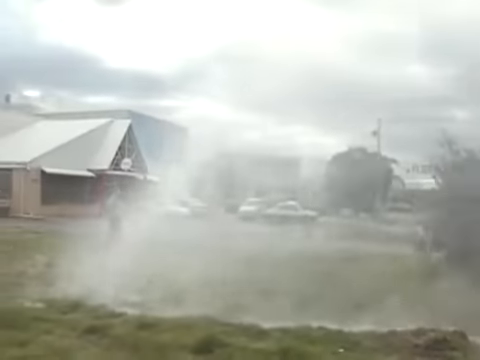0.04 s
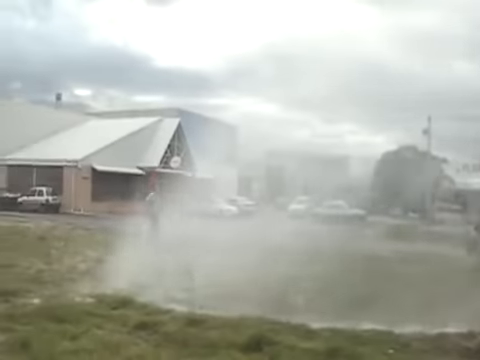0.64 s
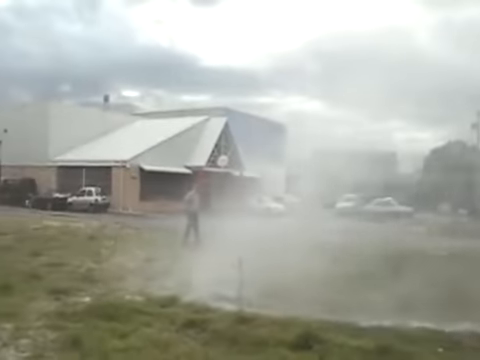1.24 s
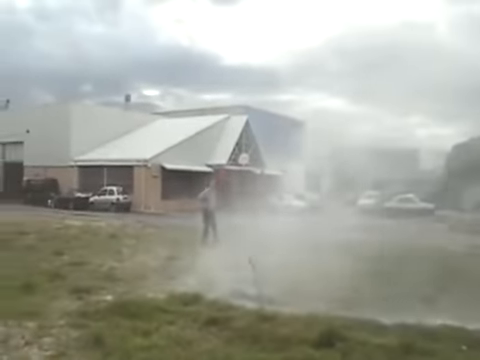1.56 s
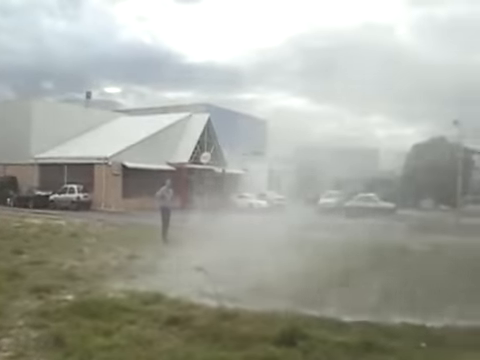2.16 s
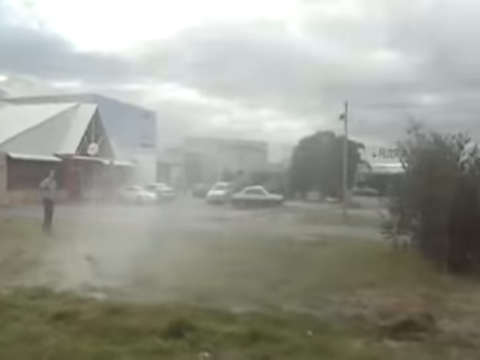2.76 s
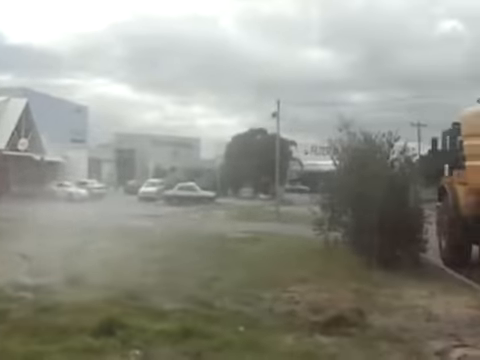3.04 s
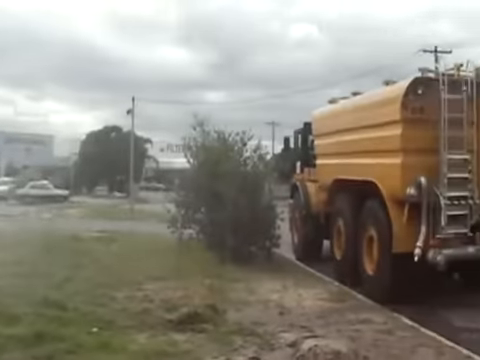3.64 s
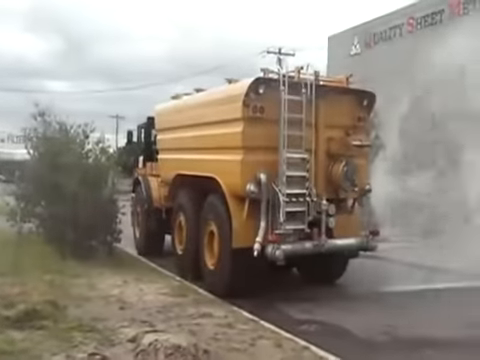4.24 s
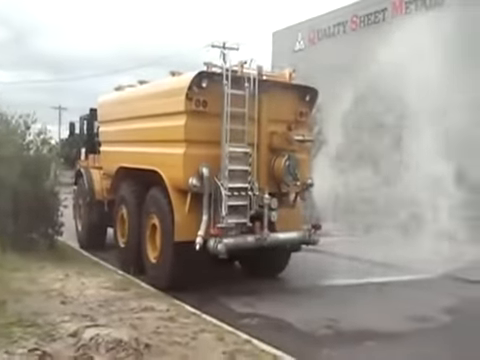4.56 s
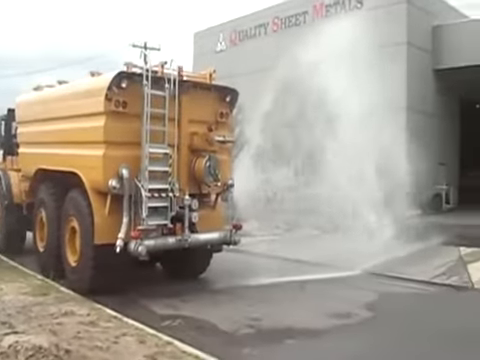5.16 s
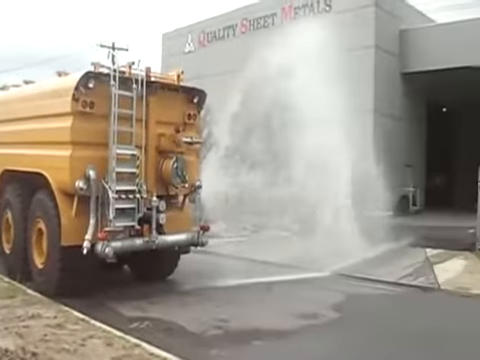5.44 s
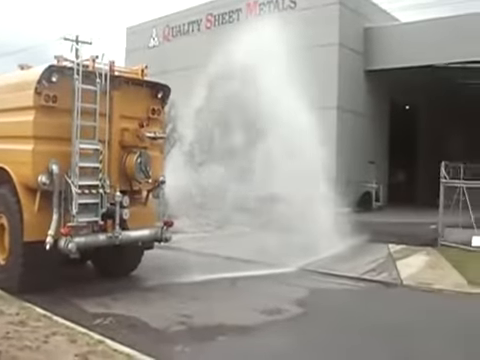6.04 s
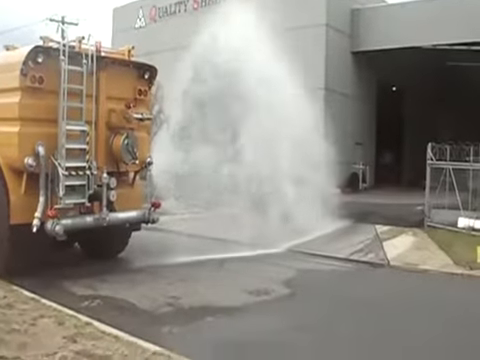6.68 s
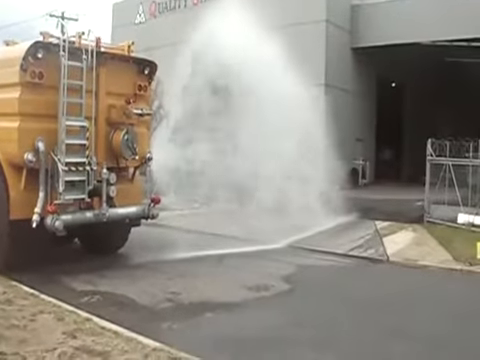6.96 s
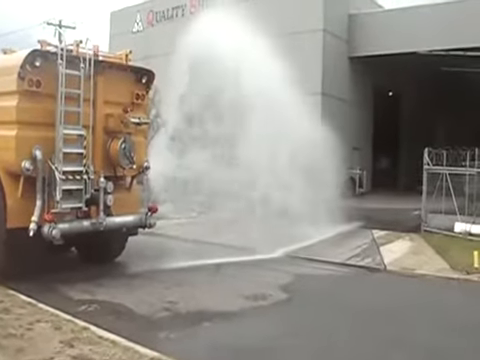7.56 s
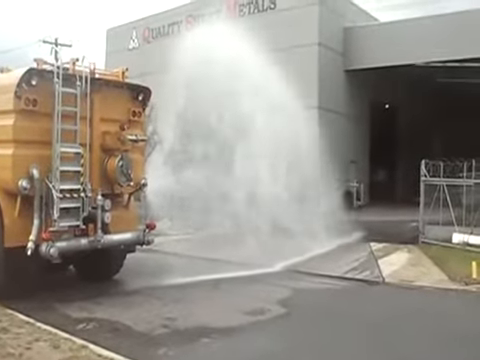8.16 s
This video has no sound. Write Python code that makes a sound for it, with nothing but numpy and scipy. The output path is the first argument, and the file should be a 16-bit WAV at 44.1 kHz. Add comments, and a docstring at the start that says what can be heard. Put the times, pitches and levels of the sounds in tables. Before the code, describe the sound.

Steady pump whine and spraying water over a diesel drone; the whine cuts out for a second, then rises and settles again.

```python
"""A pump whines over hissing jets and a diesel: a water truck spraying a yard, a few metres ahead.
The whine is the pump's pressure pulses, their overtones ringing in the pipework. The spray shuts off
for a second: the whine drops out and a low moan runs down. Then the pump takes up load again,
overshoots and settles, while the microphone swings round to face the truck and the tone colour shifts."""
import sys
import numpy as np
from scipy import signal
from scipy.fft import rfft, irfft, next_fast_len
from scipy.io import wavfile

SR = 44100
rng = np.random.default_rng(int(sys.argv[2]) if len(sys.argv) > 2 else 0)


def transcribe(signal):
    """Save signal, clipped to [-1, 1], as a 16-bit WAV file at the path in sys.argv[1]."""
    frames = np.atleast_2d(signal).T
    limited = np.clip(frames, -1, 1)
    pcm = np.round(limited * 32767).astype(np.int16)
    wavfile.write(sys.argv[1], SR, pcm)


N = 366471
T = np.arange(N) / SR
SHUT_S, OPEN_S = 1.91, 2.97  # the spray valve
PULSES_PER_TURN = 10  # of the pump shaft

# the pump sags, overshoots and settles: (time [s], offset from the governed pulse rate [Hz])
RATE_OFFSET = [(2.45, 0), (3.1, -29), (3.18, -21.7), (3.42, -20), (3.55, -10), (3.68, 18.5), (3.74, 20),
               (3.87, 15.5), (4.01, 1.5), (4.14, -3.3), (4.33, -3.3), (4.6, 0)]
# how squarely the microphone faces the rear of the truck: (time [s], share [0-1])
FACING_TRUCK = [(2.9, 0.01), (3.6, 0.45), (4.3, 0.84), (5.1, 0.74)]
# pipe resonances and one hollow: (frequency [Hz], width [Hz], lift [dB])
PIPE_RESONANCES = [(490, 20, 8), (985, 30, 4), (1145, 50, 6), (1424, 36, 16), (3440, 300, -10),
                   (3925, 40, 3), (4002, 16, 3), (4410, 60, 6), (5255, 24, 8), (5708, 40, 17),
                   (5778, 20, 14), (6362, 46, 14), (6850, 40, 8)]
# colour of water churning in the pump casing: (frequency [Hz], level [dB])
CASING_COLOUR = [(500, -30.5), (660, -2.5), (760, 2.5), (880, 1.5), (1020, 3.5), (1180, -2), (1350, -23),
                 (1650, -0.5), (1900, -6), (2400, -18)]


def pump(hz, phase, whine_rough=0.11, under_rough=0.37, fray_per_hz=.026, shaft_swing=.4, rasp_db=-33.5):
    """Pressure pulses make hum, undertone and whine; the shaft sways them and turbulence frays them."""
    # unevenness of the shaft: (rate [cycles per turn], depth [share])
    shaft_wobble = [(1, 0.03), (2, 0.015), (3, 0.0081)]
    turn = phase / PULSES_PER_TURN
    wobble = sum(depth * np.exp(1j * round(k) * turn) for k, depth in shaft_wobble)
    sway = 1 + wobble.real + 1j * shaft_swing * wobble.imag
    # a rattle one shaft order above the whine beats against it
    rasp = amp(rasp_db) * unit(np.exp(1j * turn) + fuzz(30))
    whine_db = fader(away_db=-30.5, facing_db=-18.6) + tone_swell(hz, order=6)
    whine = tone(6 * phase, amp(whine_db) * (sway + whine_rough * fuzz(35)) + rasp)
    # the undertone frays more off the governed rate, and dies away slowly
    fray = under_rough + fray_per_hz * abs(curve(RATE_OFFSET))
    under_db = fader(-25.5, -27, strain_db=6.5) + tone_swell(hz, order=3) + unloading(fall_s=0.27)
    undertone = amp(under_db) * tone(3 * phase, (sway + fray * fuzz(28)) / np.hypot(1, fray))
    # the hum hangs on while the pump coasts
    hum_db = fader(-41, -37, strain_db=4.5) + tone_swell(hz, order=1) + unloading(late_s=0.54)
    hum = amp(hum_db) * tone(phase, sway)
    return hum + undertone + amp(unloading()) * (whine + overtones(hz, phase, sway))


def tone_swell(hz, order):
    """Lift in dB of one strong pump tone: it blooms on each resonance and now and then wavers."""
    # resonances of the pump body: (frequency [Hz], width [Hz], lift [dB])
    body_resonances = [(244.4, 15, 8), (1612.4, 49.6, 8)]
    # passing swells and dips: (time [s], half width [s], order [x pulse rate], lift [dB])
    wavers = [(.75, 0.096, 3, 5), (.85, .22, 6, -6.5), (1.7, .18, 6, 4.5), (3.06, 0.035, 6, -14),
              (3.3, .06, 6, -10), (3.54, 0.056, 3, -7), (3.63, 0.068, 1, 6.5), (3.68, 0.037, 3, -2.5),
              (3.74, .04, 1, -5), (3.82, .06, 3, -6), (3.85, 0.043, 6, 4), (3.93, 0.018, 6, -7),
              (3.97, 0.038, 1, 7.5), (4.13, 0.04, 6, -8), (4.15, 0.11, 1, -8), (4.26, 0.057, 3, -10.5),
              (4.41, 0.034, 6, -5.5), (4.97, 0.15, 1, -14), (7.1, 0.93, 6, 2), (8.05, 0.48, 3, 3)]
    waver_db = sum(db * bell(s, width) for s, width, k, db in wavers if round(k) == order)
    return resonance_db(order * hz, PIPE_RESONANCES + body_resonances) + waver_db


def overtones(hz, phase, sway, rough=0.24, rough_per_order=0.016, harden_db_per_hz=.17):
    """Pump overtones, each rougher than the last, flare and ring clean as they cross a pipe resonance."""
    # overtone balance: (order [x pulse rate], level turned away [dB], level facing the truck [dB])
    partials = [(2, -42.5, -49), (4, -36, -41.5), (5, -33, -37), (7, -32.5, -29.5), (8, -40.5, -47),
                (9, -42.5, -49), (10, -44.5, -42.5), (11, -39.5, -48), (12, -52, -32.5), (13, -44, -53),
                (14, -29.5, -40.5), (15, -34.5, -33), (16, -32.5, -39.5), (17, -32, -48), (18, -35, -58),
                (19, -53.5, -42), (20, -40, -36), (21, -46, -31.5), (22, -31.5, -46), (23, -47, -45),
                (24, -33, -36.5), (25, -43, -34.5), (26, -38.5, -34.5), (27, -41, -31.5), (28, -40, -32),
                (29, -48, -34), (30, -45, -45.5), (31, -50, -45), (32, -56, -36)]
    block = 32  # samples per envelope step
    facing, turbulence = curve(FACING_TRUCK)[::block], fuzz(20)[::block]
    hz, sway, stack = hz[::block], sway[::block], np.zeros(N)
    for k, away_db, facing_db in partials:
        k = round(k)
        fray = rough + rough_per_order * k
        level = amp(away_db + (facing_db - away_db) * facing) / np.hypot(1, fray)
        ring = amp(resonance_db(k * hz, PIPE_RESONANCES)) * sway
        grit = fray * np.roll(turbulence, rng.integers(len(turbulence)))
        envelope = np.repeat(level * (ring + grit), block)[:N]
        stack += tone(k * phase + 2 * np.pi * rng.random(), envelope)
    return amp(fader(-2.5, -1.5, strain_db=1.5) + harden_db_per_hz * sag()) * stack


def jets(phase, throb=.055, shaft_throb=0.033, flutter_db=0.49, hiss_db=-0.81, weaken_db_per_hz=.09):
    """Hiss and mist from the spray heads, throbbing with the pump while it is under load."""
    # jet level, following the water pressure: (time [s], level [dB])
    jet_level = [(0.0, -16), (1.02, -17.5), (1.9, -17.5), (1.94, -18), (2.45, -21), (2.8, -26), (3.03, -19),
                 (3.63, -19.5), (3.73, -15.5), (4.03, -20), (4.16, -17), (4.74, -19), (5.18, -18.5),
                 (7.22, -20.5), (8.24, -19), (8.31, -20)]
    # hiss colour: (frequency [Hz], level turned away [dB], level facing the truck [dB])
    hiss_colour = [(298, -24, -24), (1270, -4.5, -9), (1860, -17.5, -12.5), (2350, -7, -13), (3190, -6, -3),
                   (3460, -7, -3), (4060, -1.5, -5), (5070, -4.5, -1.5), (5360, -1, -2), (6280, 2.5, 2.5),
                   (7320, -1, -3.5), (8180, -9.5, -6.5), (9030, -36, -11), (11300, -32, -33.5)]
    # sizzle of the finest mist: (frequency [Hz], level [dB])
    mist_colour = [(6000, -25), (7600, 1.5), (8400, 3.5), (9200, 3.5), (10400, 1), (12000, 1)]
    load = amp(unloading())
    pulse = throb * np.cos(phase) + shaft_throb * np.cos(phase / PULSES_PER_TURN)
    flow_db = curve(jet_level) - weaken_db_per_hz * sag() * load + flutter_db * wander(28)
    facing = curve(FACING_TRUCK)
    hiss = np.sqrt(1 - facing) * noise(hiss_colour) + np.sqrt(facing) * noise(hiss_colour, column=2)
    # the mist dies once the line has drained, and builds slowly after the valve opens
    drained_db = -20.5 * (ramp(start_s=2.68, length_s=.3) - ramp(OPEN_S, length_s=1.0))
    mist = amp(fader(-7, -12, strain_db=1.5) + drained_db) * noise(mist_colour)
    return amp(flow_db) * (1 + load * pulse) * (amp(hiss_db) * hiss + mist)


def diesel(crank_hz=30.87, rough=0.27, lumpy_db=0.54, easing=0.081, labour_db_per_hz=.22):
    """Steady engine drone; the rumble labours as the pump overshoots, and the roar eases off load."""
    # engine tones: (order [x crank rate], level [dB])
    crank_orders = [(1, -76), (3, -61.5), (5, -61), (6, -57.5), (8, -58.5), (12, -46.5), (15, -44),
                    (18, -54.5), (34, -57)]
    # exhaust rumble: (frequency [Hz], level [dB])
    rumble_colour = [(20, -45), (40, -14), (60, -25.5), (90, -7), (125, -9), (165, -3), (230, -8),
                     (400, -21)]
    # engine roar: (frequency [Hz], level [dB])
    roar_colour = [(100, -19), (160, -12), (210, 0), (310, 2.5), (430, 4), (600, 2.5), (900, -8),
                   (2000, 1.5), (4000, -16)]
    crank = angle(crank_hz * (1 + 0.0011 * wander(1.53)))
    drone = sum(amp(db) * tone(round(k) * crank, 1 + rough * fuzz(2.7)) for k, db in crank_orders)
    labour_db = labour_db_per_hz * np.maximum(curve(RATE_OFFSET), 0)
    # the tank masks rumble and roar from behind
    rumble = amp(fader(-39.5, -49, strain_db=5) + labour_db) * noise(rumble_colour)
    roar_db = fader(-27.5, -35.5, strain_db=4) + easing * unloading() + lumpy_db * wander(14)
    return drone + rumble + amp(roar_db) * noise(roar_colour)


def churn(lumpy_db=0.54):
    """Water churning in the pump: a lumpy midrange wash."""
    return amp(fader(-26.5, -28.5, strain_db=5.5) + lumpy_db * wander(7.9)) * noise(CASING_COLOUR)


def moan(rough=0.45, casing_lift_db=10):
    """A moan runs down as the pressure falls away; the pump casing lifts what lands in its band."""
    # glide of the moan: (time [s], pitch [Hz], level [dB])
    glide = [(1.9, 526, -50), (1.94, 510, -29), (2.03, 424, -29), (2.1, 332, -31), (2.25, 335, -42),
             (2.4, 331, -35.5), (2.6, 326, -35.5), (2.8, 322, -42), (2.95, 320, -60)]
    # its harmonics: (order [x pitch], level [dB])
    harmonics = [(1, -2.5), (2, -15), (3, -13)]
    pitch = curve(glide)
    phase, voice = angle(pitch), np.zeros(N)
    for k, db in harmonics:
        k = round(k)
        casing_db = np.maximum(at_hz(CASING_COLOUR, k * pitch) + casing_lift_db, 0)
        voice += amp(db + casing_db) * tone(k * phase, unit(1 + rough * fuzz(22)))
    gate = (T > glide[0][0]) * (T < glide[-1][0])
    return voice * amp(curve(glide, column=2)) * gate


def pipe_surges(ring_hz=1565, width_hz=70):
    """The returning flow sets the pipework ringing roughly."""
    # surges of flow: (time [s], half width [s], level [dB])
    surges = [(3.08, 0.1, -22), (3.59, 0.067, -18.5), (4.25, 0.25, -28)]
    envelope = sum(amp(db) * bell(s, width) for s, width, db in surges)
    return envelope * tone(2 * np.pi * ring_hz * T, fuzz(width_hz))


def stereo_image(mid, diffuse_samples=1500, swing=.22, swing_hz=8000, centred_facing=.6):
    """Stereo image: nearly mono in the bass and mids, wide and diffuse in the treble."""
    # width by band: (frequency [Hz], side minus mid [dB], side phase [rad], likeness to mid [0-1])
    image = [(100, -33.5, 2.6, .3), (900, -56, 2.6, .3), (1500, -22.5, 2.3, 1), (1750, -33, 2.3, 1),
             (2600, -62, 2.6, .2), (3800, -22.5, 2.3, .5), (6200, -16.5, 2.6, .75), (7500, -9, 2.9, .72),
             (8200, -1, 2.1, 1), (9880, 5, 0.35, .45), (10300, 0, .2, .6)]
    size = next_fast_len(N + diffuse_samples, True)
    hz = np.fft.rfftfreq(size, 1 / SR)
    likeness = at_hz(image, hz, column=3)
    coherent = likeness * np.exp(1j * at_hz(image, hz, column=2))
    diffuse = np.sqrt(1 - likeness ** 2) * unit(rfft(rng.standard_normal(diffuse_samples), size))
    spectrum = rfft(mid, size)
    side = irfft(spectrum * amp(at_hz(image, hz)) * (coherent + diffuse), size)[:N]
    # the top end pans from left to right as the microphone turns
    treble = irfft(spectrum * np.minimum(hz / swing_hz, 1) ** 2, size)[:N]
    side += swing * (centred_facing - curve(FACING_TRUCK)) * treble
    return np.array([mid + side, mid - side])


def fader(away_db, facing_db, strain_db=0):
    """Layer level in dB: it follows the microphone's aim and rises as the pump strains to build pressure."""
    strain = bell(centre_s=4.37, half_width_s=0.87)
    return away_db + (facing_db - away_db) * curve(FACING_TRUCK) + strain_db * strain


def unloading(late_s=0, fall_s=.06, rise_s=.22, depth_db=-27):
    """Duck in dB of the pump tones while the valve is shut."""
    return depth_db * (ramp(SHUT_S + late_s, fall_s) - ramp(OPEN_S, rise_s))


def sag():
    """How far the pulse rate is below the governed rate, in Hz."""
    return np.maximum(-curve(RATE_OFFSET), 0)


def resonance_db(hz, resonances):
    """Summed lift of the resonances at a frequency."""
    return sum(lift / (1 + (2 * (hz - centre) / width) ** 2) for centre, width, lift in resonances)


def amp(db):
    """Decibels to gain."""
    return 10 ** (db / 20)


def unit(x):
    """Scales to rms 1."""
    return x / np.sqrt(np.mean(abs(x) ** 2) + 1e-20)


def curve(rows, column=1):
    """One column of a time table at every sample."""
    rows = np.asarray(rows, float)
    return np.interp(T, rows[:, 0], rows[:, column])


def at_hz(rows, hz, column=1):
    """One column of a frequency table, on a log axis."""
    rows = np.asarray(rows, float)
    return np.interp(np.log(hz + 1), np.log(rows[:, 0] + 1), rows[:, column])


def ramp(start_s, length_s):
    """Linear fade from 0 to 1."""
    return np.clip((T - start_s) / length_s, 0, 1)


def bell(centre_s, half_width_s):
    """A smooth swell of height 1."""
    return np.exp(-np.minimum(((T - centre_s) / half_width_s) ** 2, 30))


def wander(rate_hz, size=8192):
    """Random drift of rms 1, mostly slower than the rate."""
    hz = np.fft.rfftfreq(size, N / SR / size)
    slow = irfft(rfft(rng.standard_normal(size)) / (1 + (hz / rate_hz) ** 2))
    return np.interp(T, np.linspace(0, T[-1], size), unit(slow - slow.mean()))


def fuzz(width_hz):
    """Narrow complex noise around 0 Hz, for roughening a tone."""
    return unit(wander(width_hz) + 1j * wander(width_hz))


def noise(colour, column=1):
    """Noise of rms 1, shaped by a colour table."""
    size = next_fast_len(N, True)
    gain = amp(at_hz(colour, np.fft.rfftfreq(size, 1 / SR), column))
    return unit(irfft(rfft(rng.standard_normal(size)) * gain, size)[:N])


def angle(hz):
    """Running phase of a rate curve, from a random start."""
    return 2 * np.pi * (np.cumsum(hz) / SR + rng.random())


def tone(phase, envelope):
    """A sine of rms 1 under a complex envelope that sways its level and phase."""
    return np.sqrt(2) * (envelope.real * np.cos(phase) - envelope.imag * np.sin(phase))


def scene(start_hz=263.3, creep_hz=1.32):
    """The whole truck in stereo; the governed pulse rate creeps up ever more slowly."""
    pulse_hz = start_hz + creep_hz * np.sqrt(T) + curve(RATE_OFFSET)
    phase = angle(pulse_hz * (1 + 0.00045 * wander(8.6)))
    return stereo_image(pump(pulse_hz, phase) + jets(phase) + diesel() + churn() + moan() + pipe_surges())


def record(dry, ceiling=.88, cutoff_hz=10380):
    """Clips the rare highest peaks, then cuts the top end steeply."""
    lowpass = signal.firwin(1023, cutoff_hz, window=("kaiser", 9), fs=SR)
    return signal.oaconvolve(np.clip(dry, -ceiling, ceiling), lowpass[None], "same")


dry = scene()
out = record(dry)
transcribe(out)
```